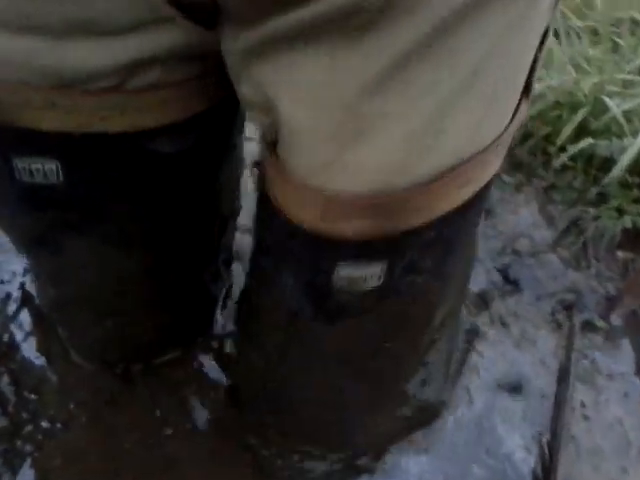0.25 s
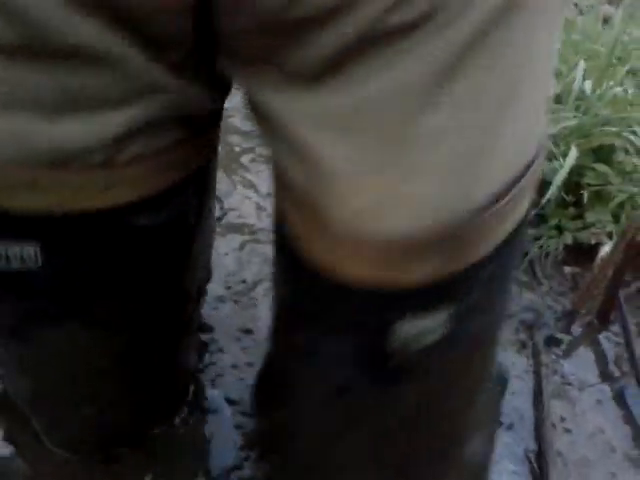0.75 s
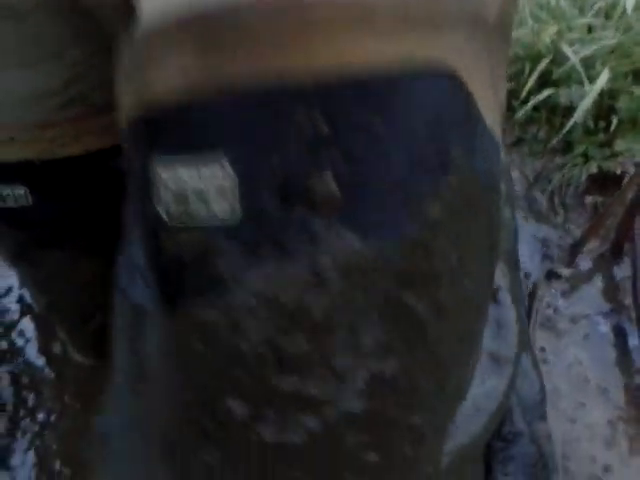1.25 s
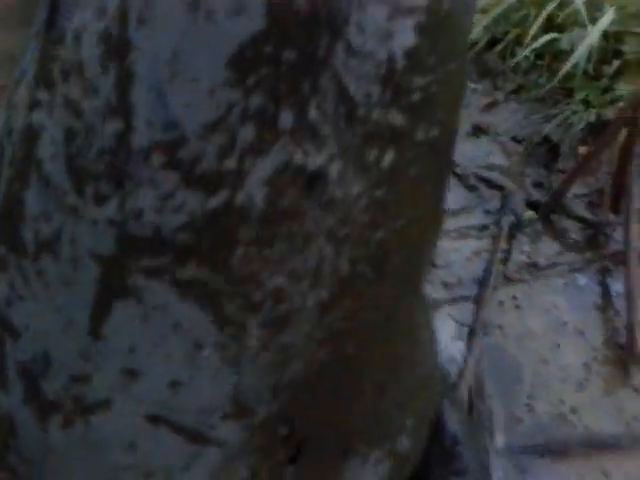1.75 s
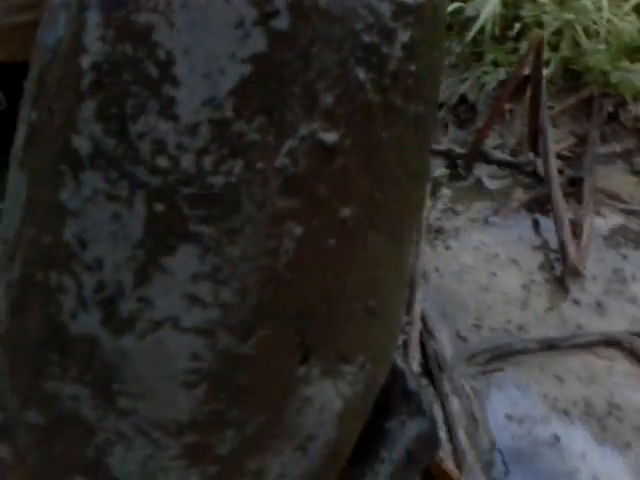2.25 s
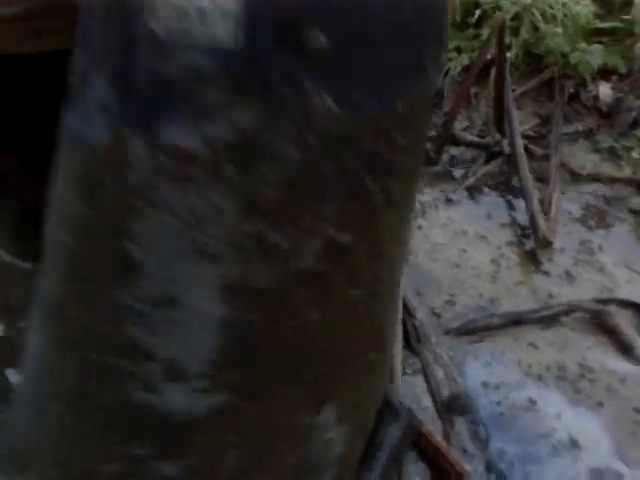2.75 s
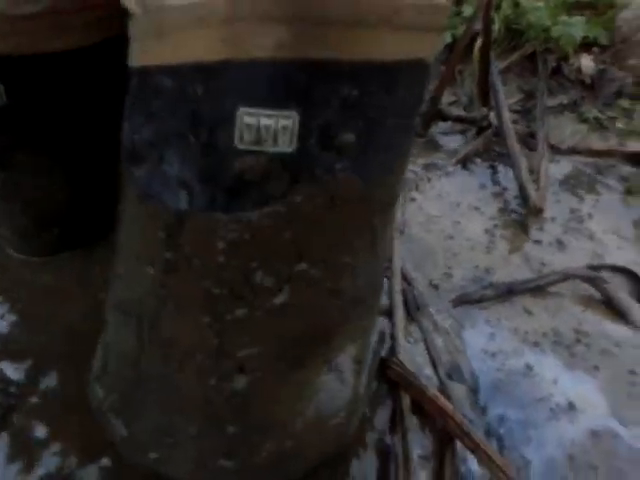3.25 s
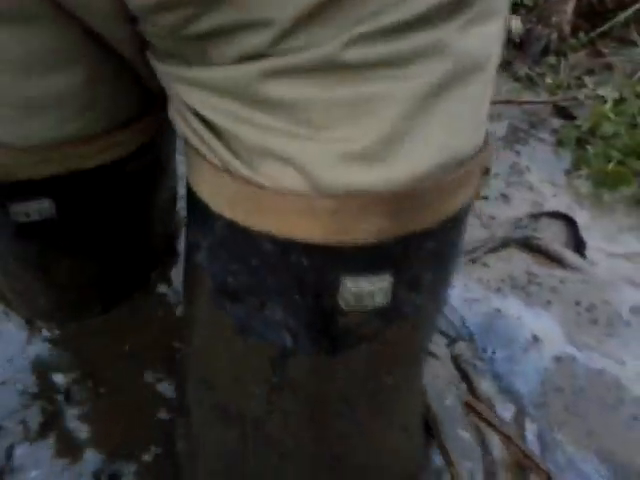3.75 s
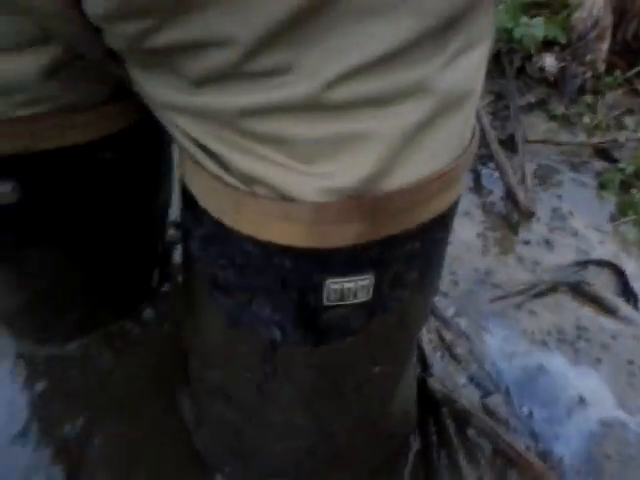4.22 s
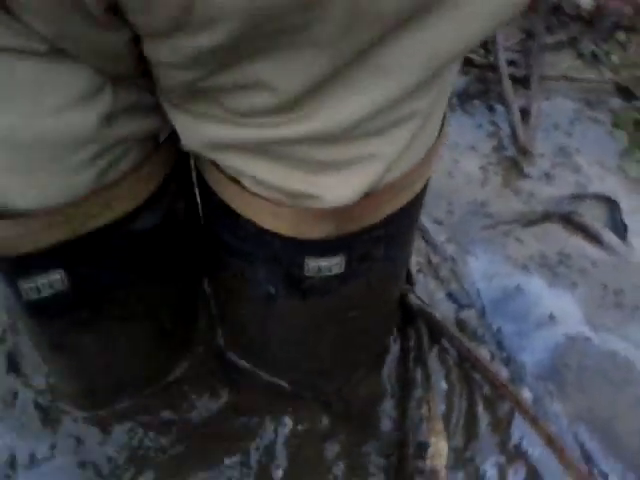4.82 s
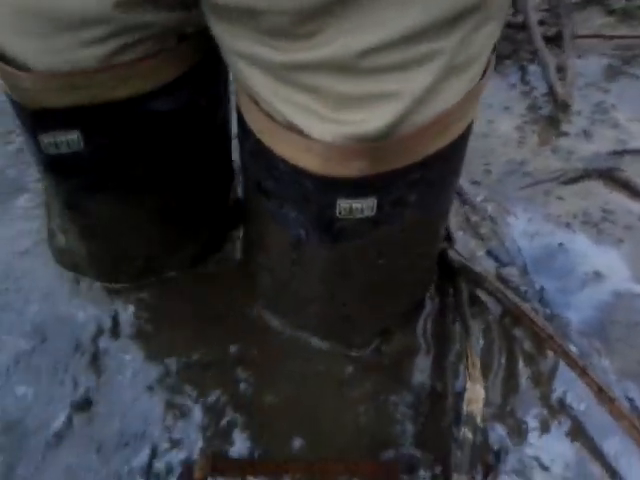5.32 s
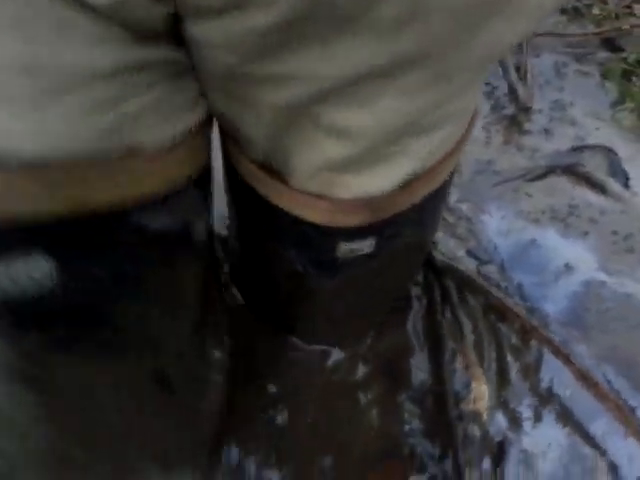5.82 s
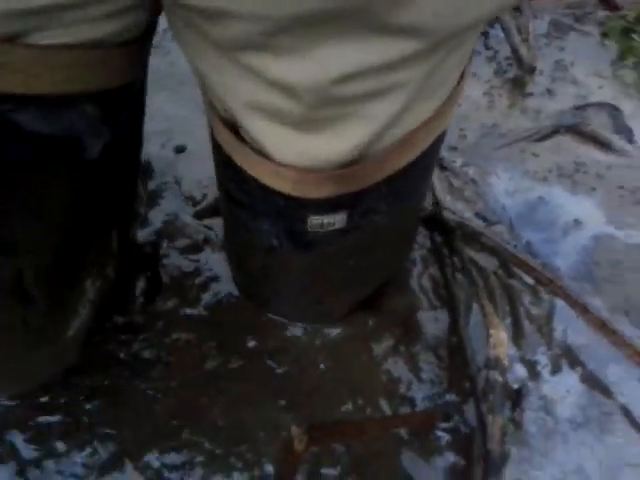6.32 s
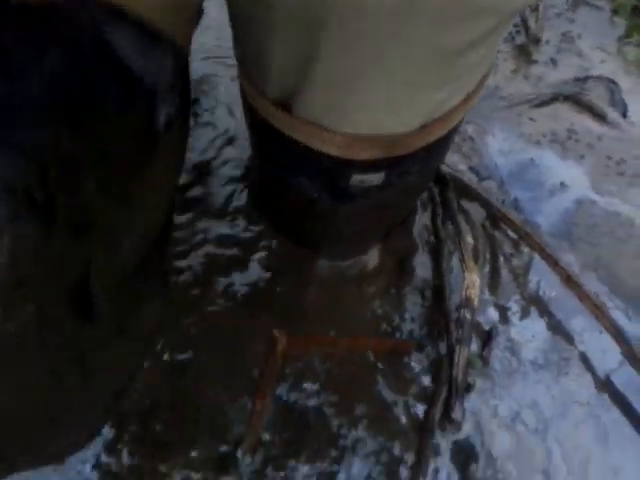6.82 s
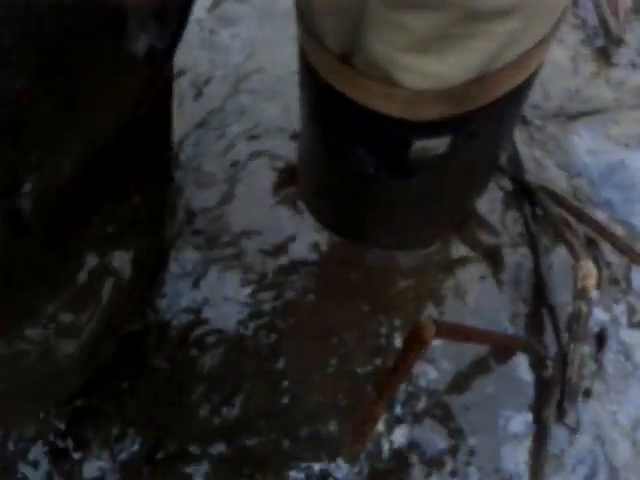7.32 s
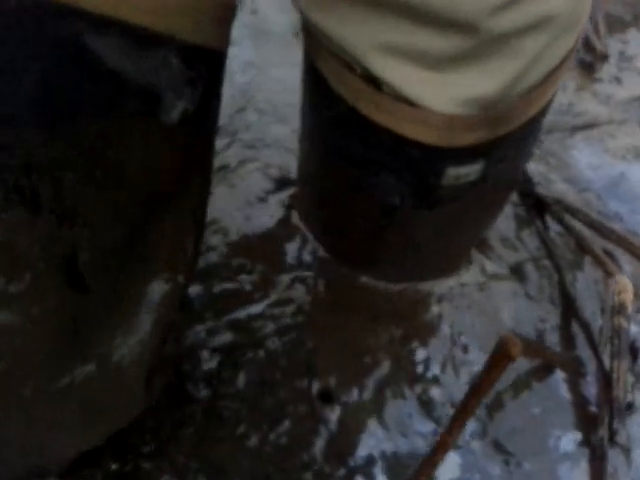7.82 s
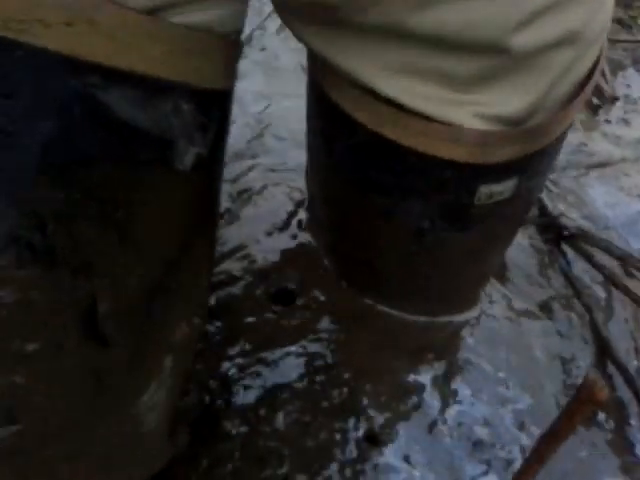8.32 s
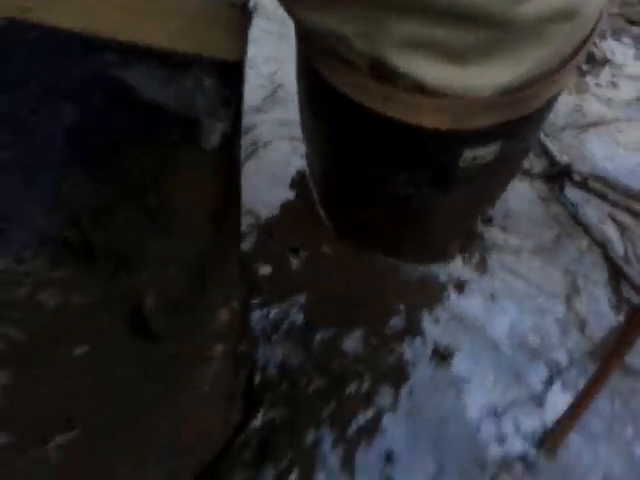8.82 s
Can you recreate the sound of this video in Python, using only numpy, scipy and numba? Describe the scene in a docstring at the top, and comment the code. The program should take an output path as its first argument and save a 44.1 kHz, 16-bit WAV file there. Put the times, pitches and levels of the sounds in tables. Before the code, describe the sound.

Rubber waders move in shallow muddy water outdoors, heard close on a hand-held camera with a narrow, dull mono sound. At 0 s a soft rush and gurgle starts with two tiny drop pops; small plips and a firmer pop follow by 0.5 s. From 1.2 to 2.5 s sloshing grows, with clustered plops, fizzing bubbles and longer rising gloops near 1.8 s, where a faint far bird chirps. A wetter surge comes at 2.9 s, another faint whistle at 3.2 s, and bright pops near 3.6 and 4 s. From 4.1 to 6.7 s it is sparser: small gloops, quiet trickle, faint whistles after 6 s. Stirring swells at 7.4 s, deep gloops come at 7.8 and 8 s, then hard clipped splats with low thumps at 8.2, 8.35 and 8.9 s. Gurgling continues to the end, just past 9 s.

```python
"""A soft rush and gurgle of muddy water comes first, pricked at once by two small drop pops.
Rubber waders shift about in the shallows below a hand-held camera: air pockets close in rising gloops,
drops and mud pop as short rings, torn films tick, and swarms of tiny bubbles fizz; a far bird whistles.
Gloops and whistles are gliding sines, pops and bubbles damped rings, the rush is noise in flickering bands.
A microphone capsule stiffens on loud peaks; the camera keeps a narrow band and clips, with low thumps."""
import sys
import numpy as np
from scipy import signal
from scipy.fft import rfft, irfft, next_fast_len
from scipy.io import wavfile
from scipy.ndimage import uniform_filter1d
from numba import njit

SR = 44100
rng = np.random.default_rng(int(sys.argv[2]) if len(sys.argv) > 2 else 0)


def file_out(sig):
    """Save sig as 16-bit WAV at sys.argv[1]."""
    # one column per channel
    cols = np.atleast_2d(sig).T
    # limit, then scale
    lim = np.clip(cols, -1, 1)
    pcm = np.round(lim * 32767).astype(np.int16)
    wavfile.write(sys.argv[1], SR, pcm)


N = 399546  # length in samples, about 9 s


def undb(db):
    """Gain of a level in dB."""
    return 10 ** (np.asarray(db) / 20)


def unit(x):
    """Scale to rms 1."""
    return x / np.sqrt(np.mean(x ** 2))


def walk(rate):
    """Random wander through a new target every 1 / rate s, joined by ramps; standard deviation near 2.7."""
    hold = int(SR / rate)
    targets = rng.standard_normal(N // hold + 1)
    return 3.27 * uniform_filter1d(np.repeat(targets, hold), hold)[:N]


@njit
def grains(n, start, turn, fade, glide, size, swell):
    """Damped rings that swell over their first turns; each turns faster by its glide every sample."""
    out = np.zeros(n)
    for k in range(len(start)):
        phase = 0.
        step = turn[k]
        gain = size[k]
        i = start[k]
        # stop once faded about 50 dB, or when the pitch nears the top of the spectrum
        while i < n and gain > size[k] / 300 and step < 2.5:
            out[i] += gain * min(phase / swell, 1.) * np.sin(phase)
            phase += step
            step *= glide
            gain *= fade[k]
            i += 1
    return out


def rings(s, hz, db, t60_s, rise_per_ms, swell_turns):
    """Damped rings struck at times s; their pitch grows by the share rise_per_ms every millisecond."""
    fade = 1000 ** (-1 / np.maximum(t60_s * SR * np.ones(len(s)), 4))
    glide = 1 + max(rise_per_ms, 0) * 1000 / SR
    start = (s * SR).astype(np.int64)
    turn = 2 * np.pi * hz / SR  # radians per sample
    return grains(N, start, turn, fade, glide, undb(db), 2 * np.pi * max(swell_turns, .1))


def glides(table, attack_ms, release_ms, release_share, flutter_db, waver):
    """Sines whose log pitch and level bend through three points; walks scaled by waver and flutter_db sway them."""
    drift = 1 + waver * np.resize(walk(250), N + SR)
    out = np.zeros(N + SR)  # room for tails past the end
    points = [0, .5, 1]  # start, halfway, end
    for (s, ms, *row), phase in zip(table, rng.random(len(table))):
        t_ms = np.arange(int(max(ms, 2) * SR / 1000)) * 1000 / SR
        hz = np.exp(np.polyval(np.polyfit(points, np.log(row[:3]), deg=2), t_ms / ms))
        db = np.polyval(np.polyfit(points, row[3:], deg=2), t_ms / ms)
        fade_in = np.clip(t_ms / attack_ms, 0, 1)
        fade_out = np.clip((ms - t_ms) / (release_ms + release_share * ms), 0, 1)
        i = int(s * SR)
        turns = phase + np.cumsum(hz * drift[i:i + len(t_ms)]) / SR
        out[i:i + len(t_ms)] += undb(db) * fade_in * fade_out * np.sin(2 * np.pi * turns)
    return out[:N] * undb(flutter_db * walk(150))


# far whistles that bend through three points:
# (t/s, length/ms, start f/Hz, middle f/Hz, end f/Hz, start level/dB, middle level/dB, end level/dB)
WHISTLES = [(1.815, 48, 2920, 3260, 3600, -48, -44, -56), (3.165, 144, 3200, 4000, 3230, -52, -57, -51),
            (6.10, 93, 3500, 3680, 3480, -60, -61, -66), (6.515, 71, 3250, 3570, 3300, -51, -61, -53)]


def bird():
    """Far whistles: soft-edged pure tones with a fluttering level."""
    return glides(WHISTLES, attack_ms=8.9, release_ms=8.8, release_share=0, flutter_db=1.4, waver=0)


# how hard the water is stirred, as cues that each layer offsets or scales: (t/s, gurgle level/dB, spray level/dB)
STIRRING = [(0.0, -47.5, -57), (0.6, -46, -55.5), (0.921, -43.5, -52), (1.25, -39, -51.5),
            (1.641, -40.5, -46.5), (2.241, -39, -48), (2.75, -43, -50), (2.91, -33, -44.5),
            (3.099, -42, -52), (3.521, -39.5, -47.5), (3.9, -43.5, -54), (4.5, -44.5, -51.5),
            (4.86, -45.5, -55.5), (5.08, -43.5, -53.5), (5.28, -40.5, -54), (5.42, -39, -50.5),
            (5.749, -47, -55.5), (6.039, -44.5, -52), (6.48, -51, -60), (6.71, -41, -51.5),
            (7.16, -41, -47), (7.41, -34, -41.5), (7.7, -41, -50.5), (7.879, -34.5, -50),
            (8.279, -40.5, -45), (8.379, -42, -53.5), (8.57, -39.5, -47), (8.801, -43.5, -50.5),
            (9.06, -37, -45.5)]


def stirring():
    """Gurgle and spray cues in dB, ramped evenly from one point to the next."""
    s, *columns = np.transpose(STIRRING)
    return [np.interp(np.arange(N) / SR, s, column) for column in columns]


# relative colour of the rush, with a steady band of hiss near 1.4 kHz: (f/Hz, level/dB per Hz)
RUSH_COLOUR = [(24, 0.5), (110, -3), (320, 3), (480, 2), (1100, -4), (1370, 1.5), (1700, -7.5),
               (2700, -15.5), (3550, -11), (3900, -19), (4400, -15)]
POND_LOW_DB, POND_HIGH_DB = -54.5, -49.5  # steady hiss of the pond and banks under the stirring
SPRAY_FROM_HZ = 1700


def rush(low_db, high_db):
    """Smooth rush of water: coloured noise in half-octave bands that flicker; the top bands follow the spray."""
    hz, db = np.transpose(RUSH_COLOUR)
    size = next_fast_len(N)
    f = np.maximum(np.fft.rfftfreq(size, 1 / SR), 1)
    noise = rfft(rng.standard_normal(size)) * undb(np.interp(np.log(f), np.log(hz), db))
    noise = noise / np.std(irfft(noise, size))
    lap_db = 0.96 * walk(24)  # each lap of water lifts all bands together
    out = np.zeros(N)
    for centre in 20 * 2 ** np.arange(0, 8.5, .5):
        share = np.clip(1 - np.abs(2 * np.log2(f / centre)), 0, 1)  # overlapping triangles
        band = irfft(noise * share, size)[:N]
        level_db = low_db if centre < SPRAY_FROM_HZ else high_db
        pond_db = POND_LOW_DB if centre < SPRAY_FROM_HZ else POND_HIGH_DB
        stirred = undb(level_db + lap_db + 1.87 * walk(30))
        out += np.hypot(stirred, undb(pond_db)) * band
    return out


def swarm(count, lo_hz, hi_hz, cycles, rise_per_ms, spread_db):
    """Many small bubbles ringing at random times, at rms 1; few are loud, and t60 averages the given cycles."""
    when, pitch, size, life = rng.random((count, 4)).T
    hz = lo_hz * (hi_hz / lo_hz) ** pitch
    db = np.minimum(-spread_db * np.log(1 - size), 11)
    t60_s = cycles * (.5 + life) / hz
    return unit(rings(when * N / SR, hz, db, t60_s, rise_per_ms, swell_turns=0.31))


def bubbles(gurgle_db, spray_db):
    """Stirred-in air rings as low gurgle, long trickle, dry crackle and bright spray, each a bubble swarm."""
    gurgle = swarm(count=3200, lo_hz=262.0, hi_hz=1020, cycles=12.0, rise_per_ms=.015, spread_db=3.0)
    trickle = swarm(count=260, lo_hz=700, hi_hz=2240, cycles=37, rise_per_ms=0.06, spread_db=3.5)
    crackle = swarm(count=350, lo_hz=450, hi_hz=3200, cycles=2.3, rise_per_ms=0, spread_db=5.0)
    spray = swarm(count=2800, lo_hz=1200, hi_hz=4500, cycles=29, rise_per_ms=0.043, spread_db=6.0)
    churn_db = 1.422 * gurgle_db + 14.5  # harder stirring folds in ever more air
    mix = undb(churn_db) * gurgle
    mix += undb(spray_db - 1.0) * trickle
    mix += undb(spray_db - 2.5) * crackle
    mix += undb(spray_db - 2.5 + 1.0 * walk(22)) * spray
    surge = undb(1.15 * walk(20))  # small waves bunch the bubbles
    return surge * mix


def ticks(s, db):
    """Brief bright rings of a tearing film."""
    hz = 3000 + 800 * rng.random(len(s))
    return rings(s, hz, db, t60_s=0.0026, rise_per_ms=0.016, swell_turns=0.24)


# thin films of mud that tear with a bright tick and no ring: (t/s, struck level/dB)
FILM_TEARS = [(0.615, -18), (0.708, -16.5), (1.327, -23.5), (1.347, -21), (1.558, -18), (1.957, -13),
              (2.667, -18.5), (2.7624, -12), (2.831, -10), (2.913, -16.5), (3.1422, -21.5), (3.2567, -14.5),
              (3.306, -15), (4.64, -13.5), (5.637, -27), (6.054, -24), (7.428, -10), (7.905, -11),
              (7.948, -3), (8.081, -16.5), (8.179, 10), (8.274, -1), (8.346, -12), (8.393, -23),
              (8.707, -23), (8.976, -31)]


def snaps():
    """Mud films tearing: bare ticks."""
    return ticks(*np.transpose(FILM_TEARS))


# drops and bursting mud blisters: (t/s, f/Hz, nominal peak level/dB, t60/ms before the swell allowance)
DROPS_AND_BLISTERS = [(0.0219, 966, -19.5, 24), (0.0348, 403, -23.5, 8.2), (0.514, 855, -8, 3.8),
                      (0.25, 1450, -34.5, 11), (0.385, 497, -25, 4), (0.6141, 440, -25.5, 41),
                      (0.683, 1310, -24, 6.1), (0.708, 800, -27, 3), (0.866, 1100, -30, 8.8),
                      (0.8834, 3220, -33, 10), (0.912, 2210, -34, 26), (0.6537, 1210, -23.5, 16),
                      (0.6724, 1254, -12.5, 10.7), (1.0602, 2560, -24.5, 2.1), (1.088, 390, -28.5, 11),
                      (1.165, 550, -33, 12), (1.2128, 480, -27.5, 24), (1.234, 574, -28.5, 21),
                      (1.2563, 630, -23.5, 6.3), (1.269, 1700, -35, 8.9), (1.2917, 710, -25.5, 6.3),
                      (1.313, 1370, -32, 13), (1.406, 1470, -29.5, 8), (1.4273, 537, -23, 17),
                      (1.4523, 497, -20.5, 4.3), (1.464, 685, -26, 26), (1.475, 510, -22, 6.7),
                      (1.5256, 332, -16.5, 3.2), (1.588, 358, -22, 5.3), (1.718, 790, -31.5, 14),
                      (1.782, 780, -26.5, 17), (1.7976, 513, -17, 4.1), (1.806, 1323, -25, 34),
                      (1.9546, 1310, -22, 4.3), (2.1296, 965, -10, 7.2), (2.1347, 1860, -23, 20),
                      (2.196, 2500, -21, 11), (2.201, 905, -22, 9.2), (2.2228, 418, -22.5, 7.4),
                      (2.251, 980, -25, 12), (2.281, 1700, -26.5, 6), (2.293, 1530, -23, 3.5),
                      (2.324, 1790, -33, 21), (2.455, 332, -27, 8), (2.473, 302, -22.5, 8.3),
                      (2.4924, 1630, -24, 23), (2.5213, 874, -18.5, 3.5), (2.5838, 2240, -26, 5.1),
                      (2.657, 450, -22, 4), (2.672, 616, -22, 7), (2.7601, 398, -20, 17),
                      (2.8214, 1590, -18, 19), (2.8296, 3130, -20, 18), (2.8904, 2650, -24, 17),
                      (2.9171, 706, -24, 17), (2.978, 1200, -26.5, 12), (3.0004, 930, -19, 4.8),
                      (3.058, 3400, -38, 5.7), (3.186, 516, -21.5, 23), (3.279, 1120, -21, 16),
                      (3.288, 3440, -25, 11), (3.3306, 520, -16, 1.7), (3.4743, 903, -24.5, 23),
                      (3.5507, 505, -25.5, 45), (3.5662, 1450, -17, 16), (3.572, 2070, -26, 14),
                      (3.5927, 830, -4.5, 5.2), (3.597, 1320, -8, 9.5), (3.605, 765, -17, 5.6),
                      (3.6422, 537, -15, 1.8), (3.703, 2090, -15.5, 13), (3.7061, 2580, -20.5, 17),
                      (3.8121, 690, -23, 9.7), (3.9685, 1300, -18.5, 8.4), (3.9716, 2380, -23, 9.7),
                      (3.9818, 1050, -11.5, 28), (3.984, 1990, -21.5, 10), (4.102, 1950, -27, 8.1),
                      (4.316, 1600, -36, 8.4), (4.375, 446, -32.5, 6.5), (4.606, 850, -25.5, 5.5),
                      (4.6401, 630, -20, 1.3), (4.668, 520, -29, 5), (4.681, 900, -30, 5),
                      (5.1364, 1830, -25.5, 16), (5.149, 1330, -19.5, 19), (5.3026, 2940, -29.5, 11),
                      (5.3502, 886, -22, 19), (5.4145, 466, -20, 49), (5.489, 1200, -25, 10),
                      (5.481, 1680, -22.5, 5), (5.7922, 445, -30, 30), (5.9815, 890, -13.5, 2.9),
                      (6.637, 1300, -28, 15), (6.652, 1330, -22, 1.5), (6.7801, 480, -27, 8),
                      (6.85, 1000, -30, 3.7), (6.96, 447, -30.5, 6.5), (6.983, 497, -27, 6),
                      (7.0116, 475, -22.5, 3.7), (7.047, 624, -25, 4), (7.062, 1110, -20.5, 3.8),
                      (7.102, 503, -28, 4), (7.128, 890, -27, 4.4), (7.19, 700, -21, 2.8),
                      (7.372, 755, -21.5, 18), (7.492, 435, -26, 11), (7.8063, 2200, -23, 8.5),
                      (7.856, 1930, -17, 10), (7.89, 900, -20.5, 14), (7.946, 1020, -19.5, 6),
                      (7.952, 1200, -5.5, 7.9), (7.966, 1300, -25, 8.8), (8.0455, 2200, -14.5, 16),
                      (8.1113, 640, -19, 5.8), (8.1275, 603, -19.5, 11), (8.1636, 442, -22.5, 70),
                      (8.1677, 980, -17.5, 18), (8.1716, 277, -29, 3.2), (8.1795, 2270, -7.5, 6),
                      (8.2132, 2190, -18.5, 5.3), (8.2655, 1210, -28, 14), (8.273, 875, -15, 7.7),
                      (8.2776, 3400, -23.5, 6.9), (8.3373, 613, -17, 5.5), (8.3429, 1046, -13.5, 27),
                      (8.343, 404, -14, 7.5), (8.3508, 2550, -10, 3.5), (8.3546, 4060, 6.5, 3.38),
                      (8.3545, 1150, -5.5, 4), (8.3583, 332, -13.5, 4.9), (8.5173, 517, -18.5, 9.6),
                      (8.5882, 605, -24, 85), (8.5939, 710, -4.5, 0.49), (8.626, 333, -28, 12),
                      (8.7818, 2270, -3.5, 2.3), (8.8754, 398, -11.5, 4), (8.882, 1230, -3.5, 6.7),
                      (8.886, 470, -15.5, 7.2), (8.883, 3010, 7.5, 0.88)]
TICK_DB, TICK_SCATTER_DB = -6, 7.5  # tick against its pop, and how far below that it may fall


def pops():
    """Each pop is a short ring, a sharp tick where the film tears, and a droplet soon after it."""
    s, hz, db, t60_ms = np.transpose(DROPS_AND_BLISTERS)
    tick_chance, delay_chance, pitch_chance, level_chance = rng.random((len(s), 4)).T
    # a ring fades while it swells, so it is struck harder and longer than its table entry
    ring = rings(s, hz, db + 6.0, t60_ms / 1000 + 2.3 / hz, rise_per_ms=0.015, swell_turns=0.21)
    tick = ticks(s + 1.3 / hz, db + TICK_DB - TICK_SCATTER_DB * tick_chance)
    drop_s = s + 0.0014 + 0.01 * delay_chance
    drop_hz = 400 * 6 ** pitch_chance
    drop_db = np.minimum(db, -14) - 4 - 9 * level_chance
    droplets = rings(drop_s, drop_hz, drop_db, t60_s=0.022, rise_per_ms=0.022, swell_turns=0.12)
    return ring + tick + droplets


# air pockets whose pitch climbs as they close:
# (t/s, length/ms, start f/Hz, end f/Hz, halfway level/dB, swell from start to end/dB)
AIR_POCKETS = [(0.242, 24, 594, 1610, -39.5, 1), (0.2766, 24.4, 528, 1440, -33.5, -9.5),
               (0.367, 11.7, 340, 844, -26, -12), (0.362, 27, 972, 1890, -38, 7.5),
               (0.468, 20, 1190, 3100, -42, -4), (0.4942, 20.5, 690, 1220, -32, 17),
               (0.5126, 19.8, 1380, 3550, -27, 1.5), (0.6048, 13.6, 730, 1080, -24.5, -4),
               (0.639, 7.7, 515, 1590, -36, 4), (0.773, 22, 1090, 2310, -43, 4),
               (0.8317, 15, 1090, 1660, -33, -18), (1.009, 23, 1065, 1960, -26.5, -5),
               (1.062, 7.5, 340, 530, -23.5, -17), (1.6287, 12.4, 392, 420, -23, -14),
               (1.68, 10.8, 1300, 2130, -30.5, -4), (1.8176, 37, 582, 1633, -16.5, 1.5),
               (1.8785, 62, 467, 2110, -18, 6.5), (2.0712, 5.5, 687, 1250, -17.5, -16),
               (2.2663, 8.2, 794, 1430, -22.5, -6), (2.3482, 13.6, 540, 1700, -21, 7.5),
               (2.427, 24, 595, 1700, -21.5, 8.5), (2.4766, 16.8, 920, 2400, -18.5, -13.5),
               (2.627, 13.3, 398, 1640, -28, 6), (2.741, 15, 500, 2000, -31.5, 2),
               (2.8355, 55, 440, 1430, -23.5, 5.5), (2.921, 31.5, 682, 1105, -19, -12.5),
               (2.9256, 22.4, 1040, 2420, -31.5, 3), (2.9927, 13, 377, 432, -23, 13),
               (3.0327, 16, 1210, 1770, -31, -8), (3.1128, 40, 780, 1660, -34.5, 6),
               (3.2374, 18.6, 537, 1100, -25, 3), (3.285, 23, 445, 1120, -19.5, 9),
               (3.4073, 45, 720, 2400, -34, 5.5), (3.4222, 42.6, 525, 1370, -19.5, 4),
               (3.522, 13, 920, 1610, -27.5, -15), (3.5534, 11.4, 287, 600, -13.5, 16),
               (3.5693, 25, 760, 1610, -30, 9), (3.699, 17, 1115, 2110, -28, 6),
               (3.7013, 38, 275, 1780, -28.5, 0.5), (3.812, 10.3, 1310, 3200, -33, 12),
               (3.885, 66, 422, 1800, -36, -2), (3.9583, 31, 512, 1600, -26, -13),
               (4.135, 77, 515, 2150, -39, 9), (4.412, 10.5, 1020, 2200, -40, -1),
               (4.466, 17, 497, 1450, -40, 7), (4.223, 15, 1180, 1530, -34, -10),
               (4.4828, 45, 844, 1670, -30.5, -8), (4.5526, 20.6, 1290, 2100, -29, -3),
               (4.6252, 14.3, 940, 1770, -24.5, 10), (4.7595, 14, 487, 1760, -25, -2),
               (4.8122, 19, 555, 1860, -33.5, 8), (5.1313, 10.8, 1450, 2420, -27, 1),
               (5.2465, 16, 997, 1720, -18, -11), (5.314, 9.2, 1400, 2500, -32, -1.5),
               (5.41, 19.4, 780, 1820, -26.5, 10), (5.4367, 26.4, 684, 1650, -19, 2),
               (5.595, 30, 697, 1560, -22.5, 3.5), (5.7235, 24, 410, 1780, -34, 0),
               (5.7914, 18.6, 1210, 1910, -19, -11), (5.858, 17, 1190, 2300, -39, 3),
               (5.942, 25, 1000, 1400, -39.5, -1), (5.9788, 38.6, 828, 1730, -18, -8.5),
               (6.1, 14.4, 596, 1250, -40, 5), (6.19, 25, 1090, 2310, -28, 3),
               (6.388, 28.6, 482, 1430, -20.5, -1), (6.605, 8.4, 1480, 2700, -31.5, 3),
               (6.672, 7.5, 1490, 3040, -34, 2), (6.773, 15, 1644, 3300, -38, -7),
               (6.782, 21.3, 1230, 1930, -25.5, -16.5), (6.918, 22, 1000, 1480, -43, 3),
               (7.18, 23, 767, 1510, -31, 1), (7.207, 11, 1930, 3320, -32.5, -15),
               (7.635, 22, 800, 1350, -26, -11), (7.684, 24.4, 400, 830, -26.5, -10),
               (7.7807, 62.3, 378, 1576, -12, 4.5), (7.7952, 14.4, 903, 1324, -21, 9),
               (7.8704, 20, 860, 1280, -23.5, 5), (7.8883, 16, 1520, 3280, -29.5, 2),
               (7.9694, 65.6, 342, 1655, -13, 7.5), (8.0708, 37, 524, 1330, -19, 8),
               (8.1802, 6.9, 984, 1980, -5.5, -14), (8.1862, 62, 360, 2390, -23, 3),
               (8.2543, 10.2, 327, 920, -16.5, -3), (8.318, 8.8, 1570, 1930, -34, -14),
               (8.378, 13, 1160, 1940, -27.5, 2), (8.3771, 7.4, 800, 1090, -17.5, -19),
               (8.4578, 38, 488, 1330, -27, -2), (8.4597, 20, 1170, 1550, -24, -19.5),
               (8.5081, 8.7, 520, 1290, -17.5, 6), (8.5233, 29, 574, 1740, -25, -1),
               (8.5254, 23, 1106, 2810, -23.5, 1), (8.555, 16, 1000, 3540, -34, -3),
               (8.652, 15, 1920, 2300, -38, -5), (8.762, 28, 653, 1070, -37, 12),
               (8.8146, 20.6, 1370, 2260, -24.5, -11.5), (8.888, 66, 331, 1414, -36, 23),
               (8.9946, 47, 380, 1400, -31, 4)]
ARCH_DB = 1  # a pocket's two ends, averaged in dB, lie this far below halfway
LAG_PER_MS = 0.0011  # long pockets climb late: share by which halfway pitch trails an even climb, per ms


def gloops():
    """A pocket opens with a dull plip, climbs in log pitch, then flicks upward as the film bursts."""
    s, ms, start_hz, end_hz, db, swell_db = np.transpose(AIR_POCKETS)
    start_db = db - ARCH_DB - swell_db / 2
    end_db = db - ARCH_DB + swell_db / 2
    middle_hz = np.sqrt(start_hz * end_hz) * (1 - LAG_PER_MS * ms)
    table = np.transpose([s, ms, start_hz, middle_hz, end_hz, start_db, db, end_db])
    climb = glides(table, attack_ms=0.33, release_ms=0.83, release_share=0.11, flutter_db=0.65, waver=0.008)
    plip = rings(s, 0.67 * start_hz, start_db + 1.5, t60_s=0.008, rise_per_ms=0.15, swell_turns=0.41)
    flick_s = s + ms / 1000 - .0025  # just before the pocket ends
    flick_db = end_db - 5.5 - 10.0 * rng.random(len(s))
    flick = rings(flick_s, end_hz, flick_db, t60_s=0.013, rise_per_ms=0.27, swell_turns=0.6)
    return climb + plip + flick


# low thumps under the hardest splashes, where the sound overloads: (t/s, peak level/dB at the capsule output)
OVERLOAD_THUMPS = [(8.18, -1), (8.3545, -11), (8.883, -9.5)]


def thumps(pulse_ms):
    """One-sided low pulses that give overloaded splashes a dull thump, added after the capsule's bass cut."""
    t = np.arange(N) / SR
    out = np.zeros(N)
    for s, db in OVERLOAD_THUMPS:
        progress = np.clip((t - s) * 1000 / pulse_ms, 0, 1)
        out -= undb(db) * np.sin(np.pi * progress) ** 2
    return out


def capsule(air):
    """The port thins airborne bass; the diaphragm stiffens, a little lopsidedly, on loud peaks."""
    high = signal.sosfilt(signal.butter(4, 190, "high", fs=SR, output="sos"), air)
    thin = 1.143 * high + .1 * air  # a little bass still gets through
    reach = 0.72  # largest swing
    return reach * np.tanh((thin + 0.06 * thin ** 2) / reach)


def scene():
    """Gloops and pops over the stirred water, through the microphone capsule, with the overload thumps."""
    gurgle_db, spray_db = stirring()
    air = bird() + rush(gurgle_db - 5.5, spray_db + 5.5) + bubbles(gurgle_db, spray_db)
    air = air + snaps() + pops() + gloops()
    return (capsule(air) + thumps(pulse_ms=1.9))[None]


BAND_HZ, TOP_HZ = 4300, 16300
CLIP = .7  # full-scale share where the converter clips


def record(dry):
    """A voice-band cut, a converter that clips, then the top cut."""
    soft = signal.sosfilt(signal.cheby1(6, 1.5, 3700, fs=SR, output="sos"), dry)
    band = signal.sosfilt(signal.ellip(8, .2, 90, BAND_HZ, fs=SR, output="sos"), soft)
    hard = np.clip(band, -CLIP, CLIP)
    return signal.sosfilt(signal.ellip(8, .2, 70, TOP_HZ, fs=SR, output="sos"), hard)


dry = scene()
out = record(dry)
file_out(out)
```